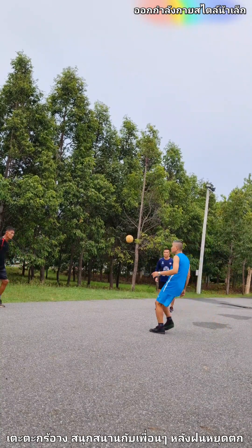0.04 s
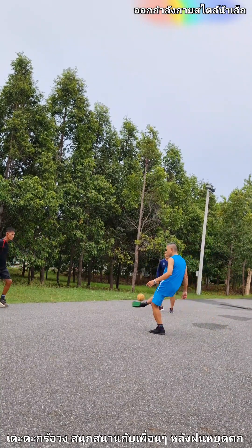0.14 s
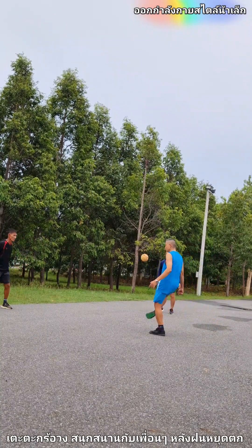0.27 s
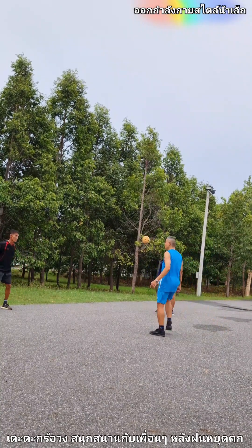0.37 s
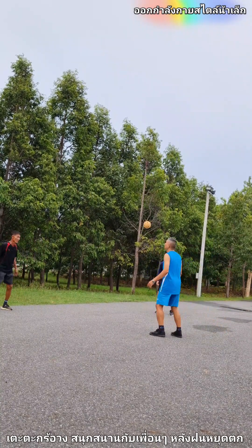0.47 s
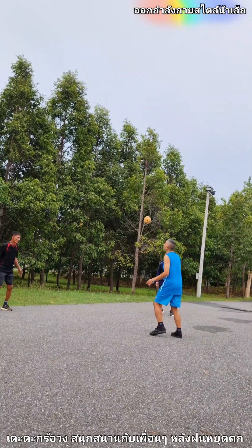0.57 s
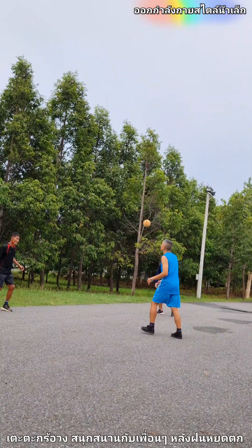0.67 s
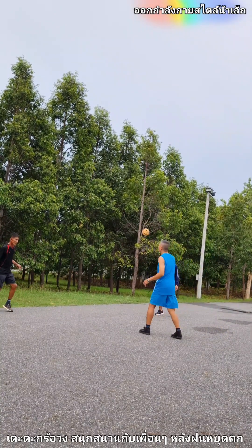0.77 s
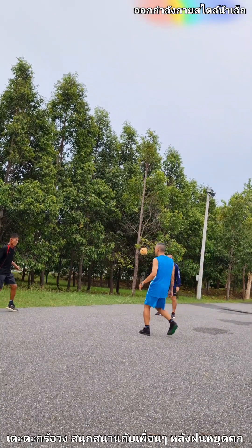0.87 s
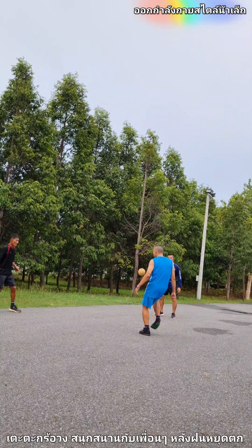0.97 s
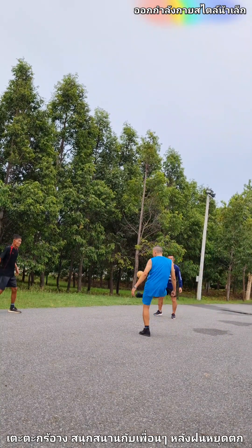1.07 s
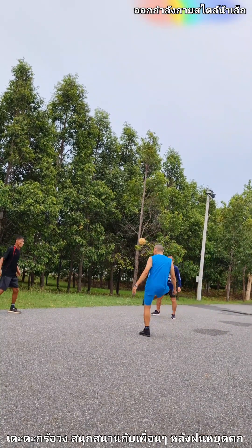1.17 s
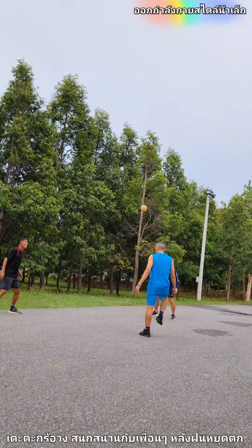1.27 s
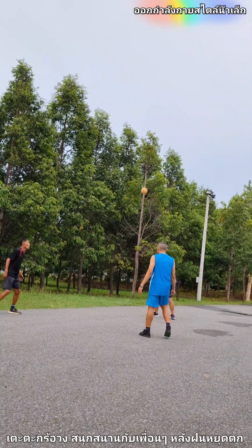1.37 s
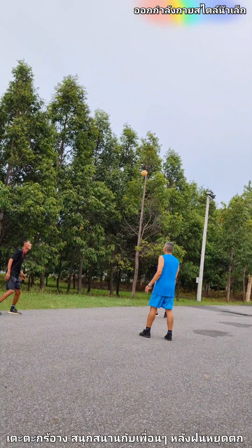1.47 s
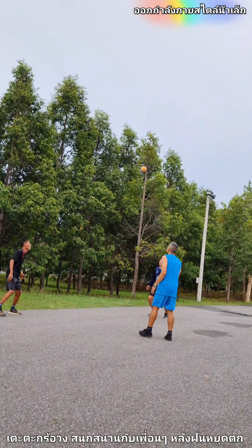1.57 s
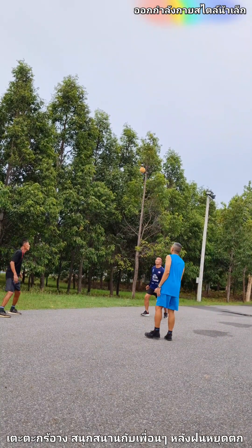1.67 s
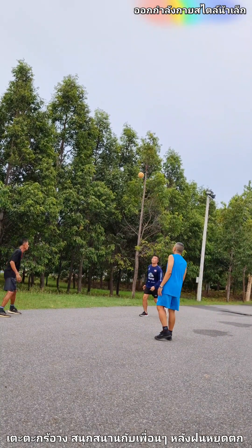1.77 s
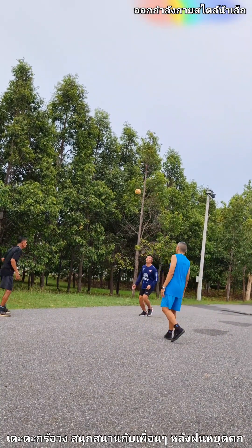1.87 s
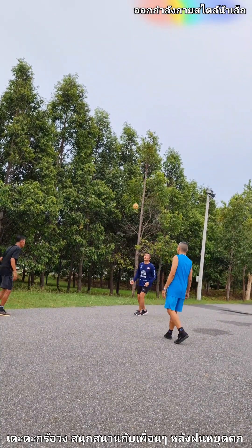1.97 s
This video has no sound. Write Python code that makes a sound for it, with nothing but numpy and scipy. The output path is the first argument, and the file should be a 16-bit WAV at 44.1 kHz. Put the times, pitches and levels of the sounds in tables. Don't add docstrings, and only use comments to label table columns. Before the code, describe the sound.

A hollow woven ball is kicked twice, a hard bright knock then a softer, rounder one, with faint shoe scuffs between, on open asphalt near trees; thin insect hiss and low rumble, close stereo microphone.

```python
import sys
import numpy as np
from scipy import signal
from scipy.fft import rfft, irfft
from scipy.io import wavfile

SR = 44100
rng = np.random.default_rng(int(sys.argv[2]) if len(sys.argv) > 2 else 0)


def master(y):
    cut = np.clip(np.atleast_2d(y).T, -1, 1)
    pcm = np.round(cut * 32767)
    wavfile.write(sys.argv[1], SR, pcm.astype(np.int16))


def rack_gain(trim_db):
    fader = np.asarray(trim_db, float)
    return 10 ** (fader / 20)


N = 88200
T = np.arange(N) / SR
HZ = np.maximum(np.fft.rfftfreq(N, 1 / SR), 1)

# start_s, thump_db, rattle_db, contact_s, facing (side of the ball towards the ports, +-1)
KICKS = [
    (0.2028, -21, -18, 0.0009, -0.84),
    (1.071, -28.5, -25.5, 0.00488, 0.99),
]
# push_at (share of contact), tilt_db_per_octave, ground_echo_db, upper_strip_db
SHOE_CONTACTS = [(.1, -1.24, -1, -4.5), (.65, 0.8, 0, -0.5)]
# mode_hz, level_db, t60_s
HARD_MODES = [(106, -3.5, 0.057), (73, -10, 0.22), (260, -4.5, 0.037), (471, -3.5, 0.06), (529, 1, 0.031),
              (636, 5.5, 0.032), (780, -8, 0.071), (1026, -6, 0.066), (1370, -6.5, 0.037)]
# mode_hz, level_db, t60_s
SOFT_MODES = [(109, 1, 0.04), (248, 0.5, 0.027), (529, -3, 0.035), (645, -9, .04), (900, -2.5, 0.037),
              (1250, -37, 0.027)]
# centre_hz, width_hz, level_db
STRIPS = [(2270, 240, 3.5), (3190, 266, 1.5), (4410, 180, -2.5), (5280, 690, 0), (6560, 360, 2.5),
          (8300, 790, -4.5), (12600, 1000, -10.5), (15000, 590, -17)]
BETWEEN_STRIPS_DB = -12.5
PUSH_S, RATTLE_FALL_S, RATTLE_UNEVEN_DB = 0.00026, 0.0028, 2.0
GROUND_DELAY_S, GROUND_THUMP_DB, GROUND_DULL_HZ = 0.00704, -10, 11300
MIC_LOW_HZ = 48.6

# level_db, tilt_db_per_octave, hold_s
TREE_RETURNS = [(-46.5, 1, .045), (-47.5, 1.5, 0.068)]
# freq_hz, density_db_per_hz
TREE_SPECTRUM = [(230, -22), (420, 1), (1000, -4), (1600, -14), (5000, -6), (8400, -6), (10000, -11),
                 (16000, -14.5)]
TREES_RISE_S, TREES_T60_S = 0.010, 0.40
LEAVES_HZ, LEAVES_T60_S = 6000, 0.30
LATE_DB, LATE_T60_S = -13.5, 1

# start_s, level_db, length_s, centre_hz,
# width_octaves
STEPS = [(.002, -60.5, 0.0034, 880, 4.3), (0.044, -63.5, 0.015, 686, 1.1), (.264, -45.5, 0.0081, 830, 2.0),
         (0.439, -62.5, 0.007, 1100, 3.9), (0.439, -57.5, 0.042, 464, 1.73),
         (0.448, -65.5, 0.045, 2170, 2.4), (0.508, -70, 0.036, 796, 2.1), (0.627, -62, 0.029, 780, 2.7),
         (0.743, -71.5, 0.02, 1130, 1.8), (0.762, -68.5, 0.031, 1060, 1.45), (1.151, -62, 0.026, 930, 0.63),
         (1.264, -67.5, 0.024, 750, 1.2), (1.405, -47.5, 0.0048, 260, 1.23),
         (1.396, -62.5, 0.036, 2880, 5.1), (1.417, -58, 0.03, 900, 1.53), (1.42, -65.5, 0.028, 3050, 2),
         (1.466, -64.5, 0.011, 566, 1.3), (1.528, -65.5, 0.036, 576, 3.05), (1.55, -74.5, 0.073, 3560, 1.7),
         (1.682, -68, 0.019, 800, 1.8), (1.675, -75.5, 0.025, 3150, 1.2), (1.718, -73, 0.01, 800, 2.6),
         (1.976, -49.5, 0.026, 780, 2.63), (1.977, -75, 0.023, 3270, 1.1)]

# low_hz, high_hz, level_db, channel_likeness (0-1)
INSECT_BANDS = [(4416, 5210, -71.5, 0.02), (6160, 6800, -72, 0.52), (7234, 8100, -64.5, 0.97),
                (5400, 5650, -86.5, 0), (7700, 8800, -89.5, 0.6), (6200, 7400, -79.5, 1),
                (3810, 4350, -86.5, 0.6)]
# time_s, level_db
CHORUS_SWELL = [(0.0, -3), (2.0, -2.5)]
CLICKS_PER_S, THROB_DB, THROB_HZ = 6000, 1.5, 23.2

# freq_hz, density_db_per_hz
RUMBLE_SPECTRUM = [(15, -9), (25, -7.5), (70, 0), (108, 0), (152, -6), (220, -11), (329, -20), (574, -28),
                   (1000, -46.5), (1300, -87), (2200, -120)]
# time_s, level_db
RUMBLE_SWELL = [(0, 1), (.4, 1.5), (.7, -0.5), (1.0, 0.5), (1.3, 0), (1.6, 0.5), (2, 0)]
# freq_hz, density_db_per_hz
AIR_SPECTRUM = [(300, -0.5), (1000, -4.5), (2000, -12.5), (3400, -15), (5000, -36), (9200, -13),
                (12500, -10.5), (16000, -9.5)]
RUMBLE_DB, AIR_DB = -51, -71.5

# freq_hz, balance_db
NEAR_BALANCE = [(60, 1.5), (300, .5), (1200, 2), (2600, -1), (4400, -2), (8100, -4), (15000, -10.5)]
# freq_hz, phase_rad
NEAR_LEAD = [(60, -.03), (300, -.12), (1210, -.3), (2500, -2.8), (3620, -.9), (5510, -2.0), (6300, .3),
             (8300, -1.9), (10000, -.1), (16000, .05)]
# freq_hz, ratio_db
DIFFUSE_SIDE = [(60, -17), (130, -26), (290, -14.5), (640, -11.5), (1410, -5), (3100, 2.5), (6820, -5.5),
                (15000, -21.5)]
# freq_hz, balance_db
DIFFUSE_BALANCE = [(60, 1.0), (180, 0.5), (550, 1.0), (1650, 6), (4970, -3), (15000, -4.5)]
# freq_hz, phase_rad
DIFFUSE_LEAD = [(30, -.015), (100, -.045), (300, -.13), (1000, -.4), (3000, -.3), (6000, -.01)]
BACKGROUND_TOP_HZ, MIX_TOP_HZ, EDGE_HZ = 15850, 16900, 900


def rms_one(x):
    return x / np.sqrt(np.mean(x ** 2) + 1e-20)


def at_hz(points):
    freq_hz, value = np.array(points).T
    return np.interp(np.log(HZ), np.log(freq_hz), value)


def colour(x, gain):
    return irfft(rfft(x) * gain, N)


def resonance(centre_hz, width_hz):
    return 1 / (1 + (2 * (HZ - centre_hz) / width_hz) ** 2)


def drift(rate_hz):
    return rms_one(colour(rng.standard_normal(N), 1 / (1 + (HZ / rate_hz) ** 2)))


def grains(per_s, uneven_db):
    sizes = rack_gain(uneven_db * np.minimum(rng.exponential(1, N), 4))
    signs = rng.choice([-1, 1], N)
    return sizes * signs * (rng.random(N) < per_s / SR)


def swell(start_s, rise_s, fall_s):
    t = np.maximum(T - start_s, 0)
    return (1 - np.exp(-(t / rise_s) ** 2)) * np.exp(-np.maximum(t - rise_s, 0) / fall_s)


def ring(x, mode_hz, t60_s):
    radius = rack_gain(-60 / (t60_s * SR))
    angle = 2 * np.pi * mode_hz / SR
    poles = [1, -2 * radius * np.cos(angle), radius * radius]
    return signal.lfilter([0, np.sin(angle)], poles, x + 1e-18)


def near(x):
    step = rack_gain(at_hz(NEAR_BALANCE) / 2) * np.exp(0.5j * at_hz(NEAR_LEAD))
    return np.array([colour(x, step), colour(x, 1 / step)])


def diffuse(mid, side):
    side = colour(side, rack_gain(at_hz(DIFFUSE_SIDE)))
    step = rack_gain(at_hz(DIFFUSE_BALANCE) / 2) * np.exp(0.5j * at_hz(DIFFUSE_LEAD))
    return np.array([colour(mid + side, step), colour(mid - side, 1 / step)])


def ball_thump(push, modes, facing):
    drive = push / push.sum()
    body = 0
    for mode_hz, level_db, t60_s in modes:
        sign = 1 if mode_hz < 150 else facing
        body = body + rack_gain(level_db) * ring(drive, mode_hz, t60_s) * sign
    return body + rack_gain(GROUND_THUMP_DB) * np.roll(body, int(GROUND_DELAY_S * SR))


def strip_rattle(strips, start_s, contact_s, ground_db):
    direct = strips * swell(start_s, contact_s, RATTLE_FALL_S)
    dull = colour(strips, 1 / (1 + (HZ / GROUND_DULL_HZ) ** 2))
    bounced = dull * swell(start_s + GROUND_DELAY_S + contact_s / 2, contact_s / 2, RATTLE_FALL_S)
    return direct + rack_gain(ground_db) * bounced


def kicks():
    out = 0
    clicks = grains(16000, RATTLE_UNEVEN_DB)
    peaks = sum(rack_gain(db) * resonance(hz, width_hz) for hz, width_hz, db in STRIPS)
    weave = (rack_gain(BETWEEN_STRIPS_DB) + peaks) / (1 + (1500 / HZ) ** 4)
    for kick, shoe, modes in zip(KICKS, SHOE_CONTACTS, (HARD_MODES, SOFT_MODES)):
        start_s, thump_db, rattle_db, contact_s, facing = kick
        push_at, tilt_db, ground_db, upper_db = shoe
        upper = rack_gain(upper_db) * resonance(8100, 900)
        strips = rms_one(colour(clicks, (weave + upper) * rack_gain(tilt_db * np.log2(HZ / 5000))))
        push = swell(start_s + push_at * contact_s, PUSH_S, PUSH_S)
        out = out + rack_gain(thump_db) * ball_thump(push, modes, facing)
        out = out + rack_gain(rattle_db) * strip_rattle(strips, start_s, contact_s, ground_db)
    mic_low_cut = signal.butter(2, MIC_LOW_HZ, "high", fs=SR, output="sos")
    return near(signal.sosfilt(mic_low_cut, out))


def trees():
    out = 0
    scatter = np.array([grains(7000, 2.56), grains(7000, 2.4)])
    leaves = 1 / (1 + (LEAVES_HZ / HZ) ** 4)
    for (start_s, *_), (level_db, tilt_db, hold_s) in zip(KICKS, TREE_RETURNS):
        decay_s = np.maximum(T - start_s - hold_s, 0) + 0.25 * np.clip(T - start_s, 0, hold_s)
        spectrum = rack_gain(at_hz(TREE_SPECTRUM) + tilt_db * np.log2(HZ / 3000))
        hiss = rms_one(colour(scatter, spectrum))
        rise = swell(start_s, TREES_RISE_S, 17)
        late = rack_gain(LATE_DB - 60 * decay_s / LATE_T60_S)
        for share, t60_s in ((1 - leaves, TREES_T60_S), (leaves, LEAVES_T60_S)):
            fade = rack_gain(-60 * decay_s / t60_s) + late
            out = out + rack_gain(level_db) * rise * fade * colour(hiss, share)
    return diffuse(*out)


def shoes():
    out = 0
    grit = np.array([grains(4000, 2.5), grains(4000, 2.5)]) * rack_gain(1.5 * drift(90))
    for start_s, level_db, length_s, centre_hz, width_octaves in STEPS:
        band = np.exp(-(2 * np.log2(HZ / centre_hz) / width_octaves) ** 2 * 1.25)
        fall = np.exp(-np.maximum(T - start_s - 0.6 * length_s, 0) / (0.57 * length_s))
        held = swell(start_s, 0.17 * length_s, 10) * fall
        burst = colour(grit, band) * held
        level = np.sqrt(np.sum(held ** 2) / np.mean(np.sum(burst ** 2, axis=1)))
        out = out + rack_gain(level_db) * burst * level
    return diffuse(*out)


def insects():
    out = 0
    for low_hz, high_hz, level_db, alike in INSECT_BANDS:
        band = signal.butter(3, [low_hz, high_hz], "band", fs=SR, output="sos")
        mid = rms_one(signal.sosfilt(band, grains(CLICKS_PER_S, 2.0)))
        side = rms_one(signal.sosfilt(band, grains(CLICKS_PER_S, 2.0)))
        alike = np.clip(alike, 0, 1)
        callers = np.sqrt(1 + alike) * mid + np.sqrt(1 - alike) * side * [[1], [-1]]
        out = out + rack_gain(level_db + THROB_DB * drift(THROB_HZ)) * callers
    chorus_db = np.interp(T, *np.transpose(CHORUS_SWELL))
    return out * rack_gain(chorus_db) * rack_gain([[-1.2], [1.2]])


def outdoors():
    rumble_gain = rack_gain(at_hz(RUMBLE_SPECTRUM)) / (1 + (HZ / 1100) ** 4)
    rumble = rms_one(colour(rng.standard_normal((2, N)), rumble_gain))
    air_gain = rack_gain(at_hz(AIR_SPECTRUM)) / (1 + (300 / HZ) ** 4)
    air = rms_one(colour(rng.standard_normal((2, N)), air_gain))
    rumble_db = RUMBLE_DB + np.interp(T, *np.transpose(RUMBLE_SWELL))
    return diffuse(*(rack_gain(rumble_db) * rumble + rack_gain(AIR_DB + 0.5 * drift(30)) * air))


def scene():
    background = trees() + shoes() + insects() + outdoors()
    return kicks() + colour(background, HZ < BACKGROUND_TOP_HZ)


def band_limit(x):
    return signal.sosfilt(signal.butter(12, 16670, fs=SR, output="sos"), x)


def record(dry):
    top_cut = np.clip((MIX_TOP_HZ - HZ) / EDGE_HZ, 0, 1) ** 2
    mix = colour(dry, top_cut)
    return band_limit(mix)


dry = scene()
out = record(dry)
master(out)
```